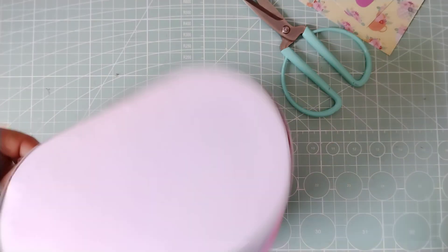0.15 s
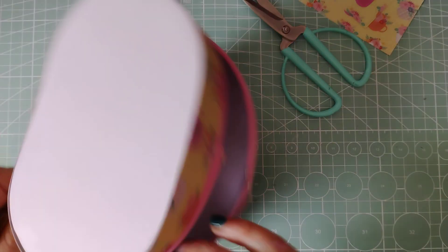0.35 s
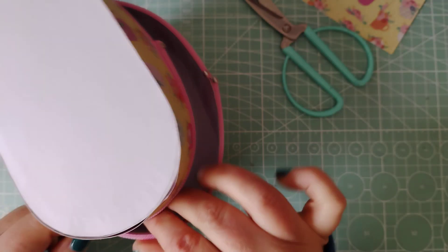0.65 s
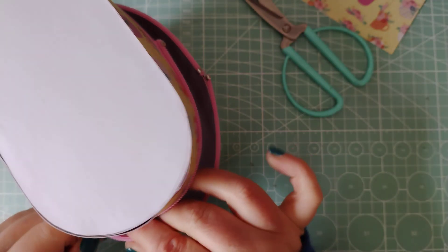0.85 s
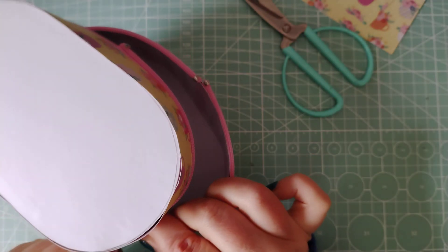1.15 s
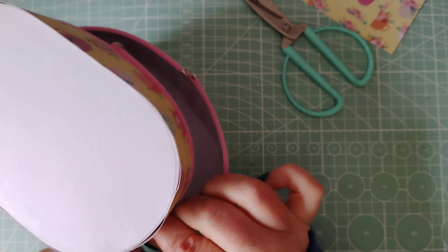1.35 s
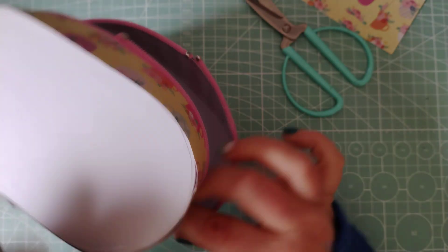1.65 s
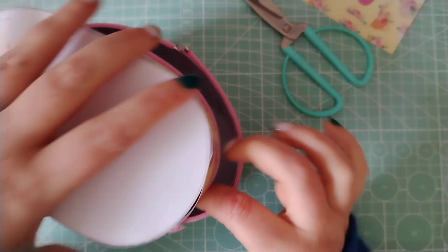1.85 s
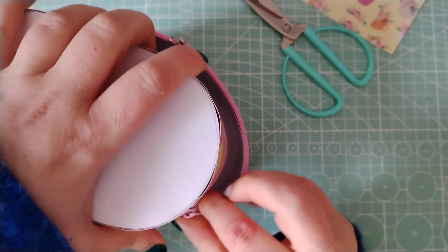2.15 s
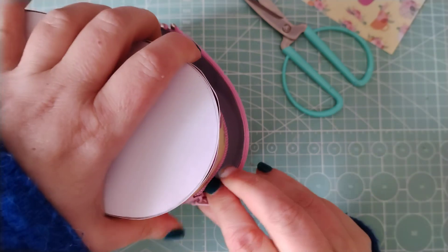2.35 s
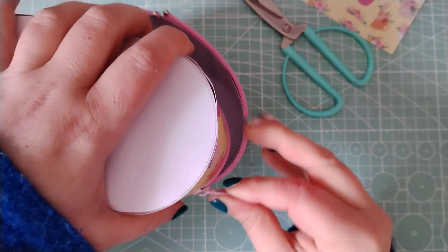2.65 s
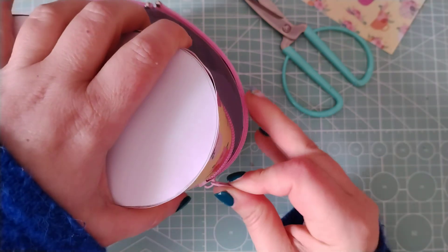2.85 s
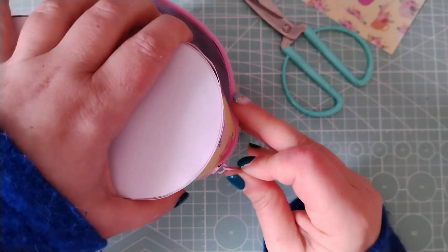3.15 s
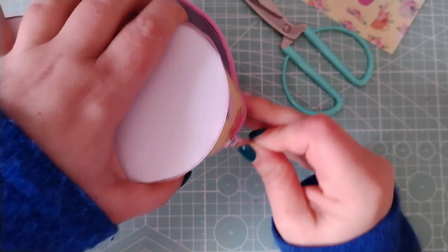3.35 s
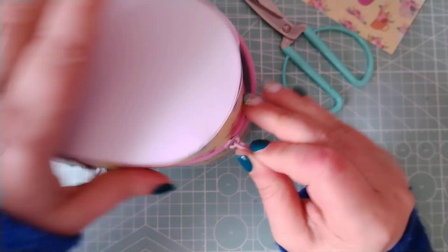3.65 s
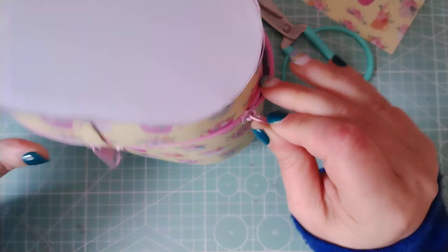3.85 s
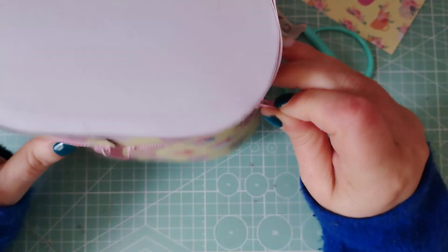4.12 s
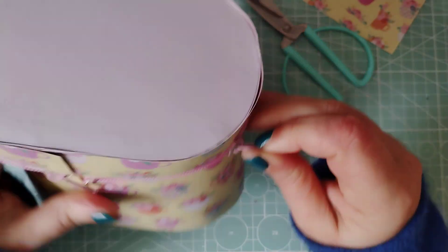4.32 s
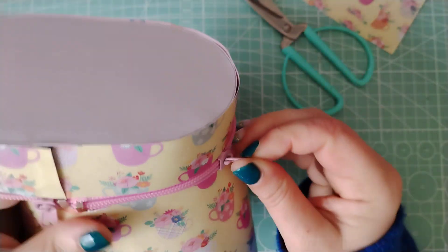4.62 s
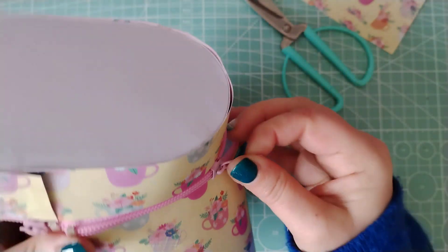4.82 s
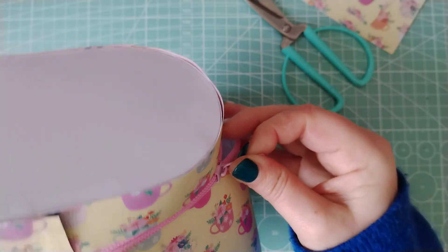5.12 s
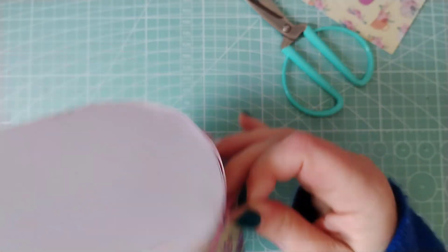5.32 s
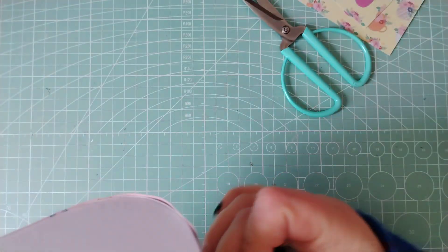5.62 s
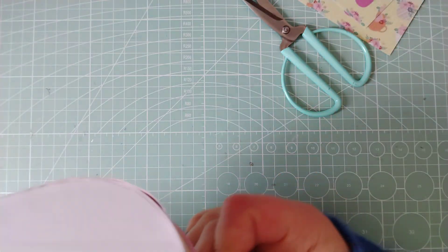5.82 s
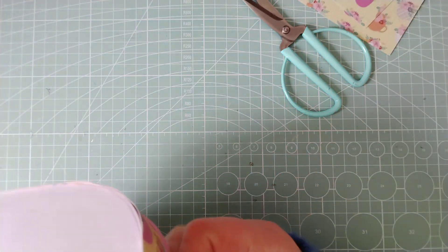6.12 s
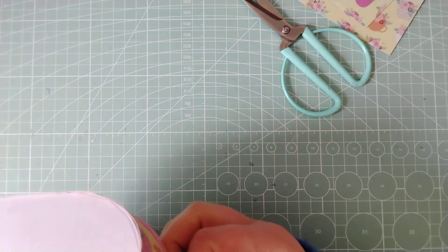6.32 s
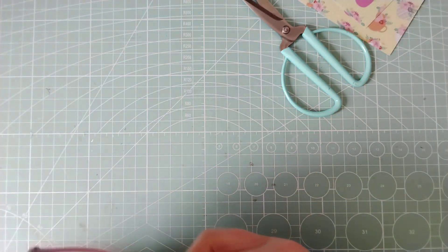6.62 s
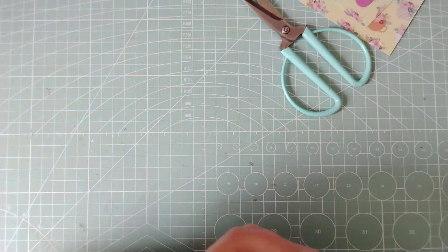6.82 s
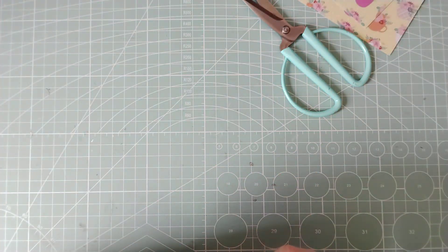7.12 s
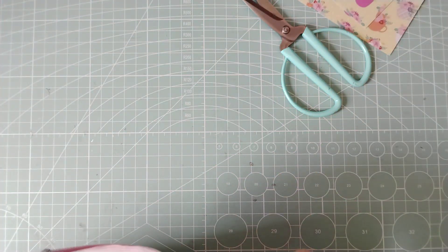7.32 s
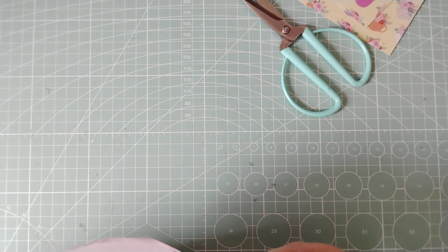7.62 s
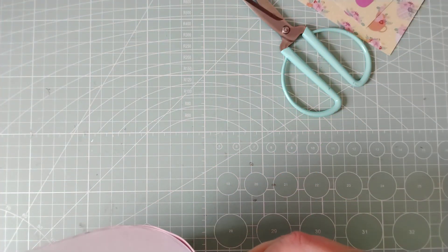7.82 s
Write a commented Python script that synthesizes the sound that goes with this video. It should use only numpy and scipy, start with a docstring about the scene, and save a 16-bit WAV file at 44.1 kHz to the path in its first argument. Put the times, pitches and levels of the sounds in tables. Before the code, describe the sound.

Heard very close in a small, quiet, dry room, slightly right of centre. From 0.06 to 0.4 s a cardboard case scrapes over a desk mat in fine judders, its metal pull ticking twice near 0.3. At about 0.57 it drops with a dull hollow clop, the loudest moment, and rocks to rest by 0.7. From 0.9 to 1.5 stiff zipper tugs rasp briefly amid dry, hollow catches, strongest near 1.3 and 1.47. Shorter, papery zips and finger rubs continue to 2.3, then sparse tugs near 2.7, 3.1 and 3.4, with bright metal ticks at 3.5. Tugs and soft bumps gather from 3.6 to 4.4. Only faint rubs and light knocks remain until 5.6. Rasps return at 5.8, with a low hand bump at 6.3 and a sharp click at 6.6. After quiet rustling, a last cluster of tugs and bumps runs from 7.4 to 7.8.

```python
"""On a desk in a small room, a phone stands just above a paper-covered cardboard case; the room is very quiet.
First the case scrapes over the desk mat while its metal pull ticks; then it clatters down and rocks to rest.
Then hands work the stiff zipper round it in short tugs: teeth rasp, dry clicks and catches ring the case.
Throughout, fingers rub and rustle on the paper and bump the walls. Slips, pushes and blows drive filters
for the hollow body, the stiff wall and the paper surface, heard direct and scattered at two microphones."""
import sys
import numpy as np
from scipy import signal
from scipy.fft import rfft, irfft
from scipy.io import wavfile

SR = 44100
rng = np.random.default_rng(int(sys.argv[2]) if len(sys.argv) > 2 else 0)


def transcribe(signal):
    """Save signal, clipped to [-1, 1], as a 16-bit WAV file at the path in sys.argv[1]."""
    frames = np.atleast_2d(signal).T
    limited = np.clip(frames, -1, 1)
    pcm = np.round(limited * 32767).astype(np.int16)
    wavfile.write(sys.argv[1], SR, pcm)


N = 351477

# Room tone: (frequency [Hz], relative level [dB])
ROOM = [(250, 2), (800, -15), (8000, -14)]
# Faint rustle under the holding fingers, before each part's offset: (time [s], level [dB])
GRIP = [(0, -59), (0.75, -63.5), (1.15, -66.5), (1.419, -78), (1.63, -66), (2.25, -67.5), (2.54, -71.5),
        (2.75, -69.5), (2.901, -108), (3.021, -83), (3.449, -71), (4.7, -67.5), (5.15, -84), (5.8, -58),
        (6.08, -70.5), (6.38, -63), (7.199, -90.5), (7.5, -69), (7.92, -85)]
# Soft bumps of hand and desk on the case: (time [s], body level [dB], ring [Hz])
BUMPS = [(0.584, -28.5, 230), (0.803, -48.5, 333), (1.329, -41.5, 52), (1.572, -36, 316), (1.803, -39, 360),
         (3.584, -46.5, 274), (3.683, -39.5, 145), (3.718, -44, 373), (4.104, -55, 130),
         (4.268, -44.5, 230), (4.302, -31, 137), (4.416, -40.5, 167), (4.994, -48, 130),
         (5.389, -52.5, 121), (6.204, -37.5, 233), (6.295, -28, 222), (6.305, -34.5, 72), (7.391, -49, 130),
         (7.447, -43, 140), (7.463, -38.5, 395), (7.759, -42, 156)]
# Fingers sliding on paper: (start [s], length [s], body level [dB], extra edge [dB])
RUBS = [(0.423, 0.015, -43.5, -2.5), (0.595, 0.14, -42, -3), (1.683, 0.2, -50, -4),
        (1.976, 0.092, -51.5, 9.5), (2.262, 0.08, -55.5, -0.5), (2.406, 0.064, -57, -3.5),
        (3.17, 0.059, -56.5, 3), (3.658, 0.099, -49, -3.5), (3.79, 0.1, -57, 2), (4.388, 0.084, -53.5, 2),
        (4.584, 0.089, -55.5, 3), (4.81, 0.1, -62, -0.5), (5.218, 0.073, -67.5, -6.5),
        (5.62, 0.031, -41, 4.5), (6.176, 0.091, -55, -3.5), (6.727, 0.096, -57.5, 1.5),
        (7.003, 0.095, -85, 3), (7.923, 0.061, -60.5, -7.5)]
# Case scraping over the desk mat: (time [s], body level [dB])
DRAG = [(0.06, -47.5), (0.15, -34.5), (0.25, -38), (0.37, -45), (0.405, -58.5)]
# Case set down on the desk, rocking to rest: (time [s], body level [dB], ring [Hz])
LANDINGS = [(0.57, -20.5, 850), (0.581, -22, 584), (0.597, -34, 580), (0.621, -36.5, 560),
            (0.647, -28, 670), (0.66, -36, 590)]
# Tugs of the slider: (start [s], length before the creep [s], body level [dB], extra edge [dB])
TUGS = [(0.972, 0.023, -40, 6.5), (1.158, 0.032, -35, -3), (1.272, 0.047, -28.5, -4),
        (1.464, 0.036, -39, -6), (1.738, 0.041, -50, 13), (1.928, 0.03, -45, 16), (2.032, 0.039, -48.5, 5),
        (2.151, 0.014, -42, -4), (2.24, 0.024, -54, 25), (2.682, 0.016, -40.5, -7),
        (3.07, 0.02, -33.5, -0.5), (3.353, 0.02, -43.5, 3), (3.564, 0.024, -41, 0),
        (3.792, 0.012, -41.5, -1), (4, 0.012, -41, 5), (4.018, 0.036, -42, 4.5), (4.291, 0.041, -40, 12.5),
        (5.818, 0.052, -39.5, 6.5), (5.93, 0.025, -40.5, 4.5), (6.399, 0.029, -43.5, 3),
        (6.461, 0.016, -41, 11), (6.591, 0.036, -45.5, 17.5), (7.387, 0.018, -39.5, -6.5),
        (7.447, 0.052, -37.5, -2.5), (7.624, 0.0099, -39.5, 0), (7.739, 0.031, -37.5, -4.5)]
# Catches of the slider and knocks on the case: (time [s], body level [dB], extra edge [dB])
KNOCKS = [(0.363, -40, 8), (0.648, -44, 9.5), (0.921, -42.5, -18), (1.011, -61, 10), (1.03, -32.5, 1),
          (1.045, -46, 4.5), (1.102, -37, -4), (1.158, -40.5, -3), (1.171, -34, -1.5), (1.2, -33, 4.5),
          (1.229, -49, 5), (1.296, -35, 4), (1.313, -26.5, 6.5), (1.331, -26, 0.5), (1.455, -31.5, -1.5),
          (1.47, -27.5, 4), (1.695, -41, 3), (1.709, -50, 16.5), (2.094, -49, 8), (2.209, -49, -3),
          (2.238, -42, -1), (2.612, -47.5, 3.5), (3.111, -33, 3), (3.347, -38, 1), (4.052, -45.5, 0),
          (4.234, -45, -1), (4.267, -41.5, -0.5), (4.367, -38.5, 6.5), (4.995, -46, 2.5),
          (5.728, -45.5, -8.5), (5.955, -41, 2.5), (6.312, -36.5, -9.5), (6.601, -37.5, 6),
          (7.448, -41.5, 4.5), (7.488, -44, 3.5), (7.76, -46, 7)]
# Short dry clicks ringing the wall, from the set-down, catches and teeth: (time [s], level [dB], ring [Hz])
CLICKS = [(0.571, -27.5, 1170), (1.284, -39.5, 2580), (1.296, -31.5, 1890), (1.313, -32, 2950),
          (1.33, -33.5, 1800), (1.47, -36.5, 2700), (1.508, -43.5, 1500), (2.032, -42.5, 1604),
          (2.219, -47, 1560), (2.287, -46.5, 1630), (3.091, -41.5, 1550), (4.02, -45.5, 1640),
          (6.601, -34.5, 1240), (7.387, -49, 1330)]
# Ticks of the metal pull: (time [s], strike level [dB])
TICKS = [(0.318, -35), (0.332, -37), (0.987, -55), (3.468, -44), (3.501, -36.5), (3.516, -37)]
# Wall under the slider as the zipper travels round the case: (time [s], low ring [Hz], high ring [Hz])
SEAM_RINGS = [(1.3, 666, 1698), (4.0, 369, 1520), (7.5, 380, 1240)]

# Resonances of the case, then of the pull: (frequency [Hz], width [Hz], lift [dB])
CASE_MODES = [(128, 18, 8.5), (227.3, 26, 6.5), (539.4, 60, 4.5), (608, 80, 4), (730, 120, 6.5),
              (1137, 370, 2.5), (1544, 66, 2)]
PULL_MODES = [(2820, 860, 18.5), (4070, 550, 8)]
# Hollow body, stiff wall, paper surface and metal pull: (frequency [Hz], relative level [dB])
BODY = [(30, -25), (60, -2.5), (330, 0.5), (560, 0.5), (1200, -12), (1900, -26), (5000, -57.5)]
CLACK = [(100, -37), (650, -19), (1100, -1.5), (1550, 6.5), (2200, 1.5), (3300, -4.5), (4500, -17),
         (9000, -50)]
HISS = [(300, -41), (2300, -29.5), (3700, 0.5), (6300, 6), (8300, 6), (9700, -6.5), (12000, -11.5),
        (14500, -14)]
PULL = [(200, -8.5), (700, 2), (1400, -6.5), (5000, -10.5), (8500, -16.5), (10500, -38)]

# How the wall's clack (first row) and the surface's hiss (second) follow the body level:
# (level at the usual push [dB], growth [dB per dB of body level], share of the extra edge [ratio])
TUG_LAW = [(-43.5, 0.9, 0.12), (-54.5, 1.5, 0.82)]
KNOCK_LAW = [(-46, 0.86, 0.71), (-55, 0.46, 1)]
RUB_LAW = [(-45, 0.74, 0.24), (-50, 0.59, 0.93)]

USUAL_DB = -40  # body level of the usual push
ROOM_DB = -92
EARLY_T60_S, LATE_T60_S, LATE_DB = 0.093, 0.21, -25.5
DIRECT_DB = -6  # direct sound against scatter, before each source's nearness
SIDE_CORNER_HZ, SIDE_DB, MAX_PORT_DELAY_S = 409, -1, 0.00024
CASE_PAN_DB = -0.97  # left minus right
BLOW_S = 0.02  # time over which a short contact's level is reckoned
TUG_CREEP_S = 0.008
RUB_RISE_SHARE = 0.28  # of a stroke's length
KNOCK_RING_HZ, KNOCK_OCTAVES_PER_DB, KNOCK_SCATTER_OCTAVES = 716, 0.035, 0.11
TOP_HZ = 14500


def undb(db):
    """Decibels to gain."""
    return 10 ** (np.asarray(db) / 20)


def level(x, db, seconds):
    """Give a sound the energy of that rms level held for that time."""
    energy = np.mean(np.sum(x ** 2, axis=-1))
    return x * undb(db) * np.sqrt(seconds * SR / energy)


def add(out, start, x):
    """Mix a sound in at its time."""
    i = int(start * SR)
    out[:, i:i + x.shape[1]] += x[:, :N - i]


def butter(x, hz, kind, order=1):
    """Low-pass or high-pass."""
    return signal.sosfilt(signal.butter(order, hz, kind, fs=SR, output="sos"), x)


def convolve(x, response):
    """Pass a sound through an impulse response."""
    return signal.fftconvolve(np.atleast_2d(x), np.atleast_2d(response), axes=-1)


def impulse_response(spectrum, modes=(), size=4096):
    """Minimum-phase response of a broad spectrum with resonances on it, made by folding its cepstrum."""
    f = np.maximum(np.fft.rfftfreq(size, 1 / SR), 1)
    points_hz, points_db = np.transpose(spectrum)
    db = np.interp(np.log(f), np.log(points_hz), points_db)
    for hz, width_hz, lift_db in modes:
        db = db + lift_db / (1 + (2 * (f - hz) / width_hz) ** 2)
    cepstrum = irfft(np.log(undb(db)))
    cepstrum[1:size // 2] *= 2
    cepstrum[size // 2 + 1:] = 0
    return irfft(np.exp(rfft(cepstrum)))


def paths(direct_db, size=11000):
    """From one spot on the case to two microphones: direct sound, then scatter off desk and walls."""
    t = np.arange(size) / SR
    early = undb(-60 * t / EARLY_T60_S)
    late = undb(LATE_DB - 60 * t / LATE_T60_S)
    onset = 1 - np.exp(-t / 0.00031)
    mid, side = rng.standard_normal((2, size)) * (early + late) * onset
    # long waves reach both microphones alike
    side = undb(SIDE_DB) * butter(side, SIDE_CORNER_HZ, "high")
    both = level(np.array([mid + side, mid - side]), 0, 1 / SR)
    for channel in range(2):
        delay = int(rng.uniform(0, MAX_PORT_DELAY_S) * SR)
        both[channel, delay] += undb(direct_db)
    return both


def sound_case(force, parts, levels_db, seconds, near_db=0):
    """A force drives each part of the case to its own level; near spots sound more direct."""
    arriving = convolve(force, paths(DIRECT_DB + near_db))
    return sum(level(convolve(arriving, part), db, seconds) for part, db in zip(parts, levels_db))


def loads(law, db, edge_db):
    """Levels of body, clack and hiss for a push of that strength and sharpness."""
    return [db] + [usual + growth * (db - USUAL_DB) + share * edge_db for usual, growth, share in law]


def spot(force, hz, lift=2.6, q=4.1):
    """Each spot on the wall favours a resonance of its own; lift is its added gain."""
    return force + lift * signal.lfilter(*signal.iirpeak(hz, q, fs=SR), force)


def stick_slip(size, rate_hz, depth_db):
    """Friction holds and lets go: its gain wanders at random, this many times a second."""
    steps = np.arange(size) * rate_hz / SR
    held = rng.standard_normal(int(steps[-1]) + 2)
    return undb(depth_db * np.interp(steps, np.arange(len(held)), held))


def fibres(size, per_second, spread_db):
    """Friction as many tiny slips at random times, a few much larger than the rest."""
    slips = rng.random(size) < per_second / SR
    strength = undb(spread_db * np.minimum(rng.exponential(size=size), 5))
    x = slips * strength * rng.standard_normal(size)
    return x / (np.std(x) + 1e-9)


def blow(crunch_db=-26, crunch_s=0.0018, size=900):
    """A sharp contact and the decaying crunch of the surfaces settling."""
    force = undb(crunch_db) * np.exp(-np.arange(size) / SR / crunch_s) * rng.standard_normal(size)
    force[0] += 1
    return force


def room_tone():
    """The very quiet room: steady noise, mostly low, independent at the two microphones."""
    noise = convolve(rng.standard_normal((2, N)), impulse_response(ROOM))[:, :N]
    return level(noise, ROOM_DB, N / SR)


def grip(parts, body_db=3.5, clack_db=2.0, hiss_db=-1, lowest_hz=520, highest_hz=760):
    """The holding fingers creep on the paper in fits and starts, each stretch on another spot."""
    out = np.zeros((2, N))
    offsets_db = np.array([body_db, clack_db, hiss_db])
    for (start, start_db), (end, end_db) in zip(GRIP, GRIP[1:]):
        seconds = max(end - start, BLOW_S)
        size = int(seconds * SR)
        pressure = undb(np.linspace(start_db, end_db, size))
        creep = pressure * fibres(size, per_second=1400, spread_db=3.0)
        creep = creep * stick_slip(size, rate_hz=40, depth_db=3.0)
        creep = butter(creep, 190, "high")  # so light a touch hardly moves the whole box
        spot_hz = lowest_hz * (highest_hz / lowest_hz) ** rng.random()
        creep = spot(creep, spot_hz, lift=1.3)
        mean_db = 10 * np.log10(np.mean(pressure ** 2))
        add(out, start, sound_case(creep, parts, mean_db + offsets_db, seconds, near_db=2))
    return out


def bumps(parts, clack_db=-18, hiss_db=-27, q=2.1, softness=1.4, size=3000):
    """A soft contact is a long push: it wakes a low resonance, and the paper crunches a little."""
    out = np.zeros((2, N))
    for start, db, hz in BUMPS:
        push = butter(signal.unit_impulse(size), softness * hz, "low", order=2)
        push = signal.lfilter(*signal.iirpeak(hz, q, fs=SR), push)  # the wall springs back
        force = push / np.max(push) + blow(crunch_db=-21, crunch_s=0.02, size=size)
        levels_db = [db, db + clack_db, db + hiss_db]
        add(out, start, sound_case(force, parts, levels_db, BLOW_S, near_db=5))
    return out


def rubs(parts):
    """Skin drags over paper, swelling to a peak and dying away; each stroke crosses another spot."""
    out = np.zeros((2, N))
    for start, seconds, db, edge_db in RUBS:
        t = np.arange(0, max(seconds, BLOW_S), 1 / SR)
        swell = np.interp(t, [0, RUB_RISE_SHARE * t[-1], t[-1]], [0, 1, 0])
        force = swell * fibres(len(t), per_second=1400, spread_db=2.5)
        force = force * stick_slip(len(t), rate_hz=120, depth_db=2.0)
        spot_hz = 740 * 2 ** (0.15 * rng.standard_normal())
        force = spot(force, spot_hz, lift=1.0)
        levels_db = loads(RUB_LAW, db, edge_db)
        add(out, start, sound_case(force, parts, levels_db, t[-1], near_db=4.5))
    return out


def drag(parts, clack_db=-7.0, hiss_db=-9, ring_hz=850):
    """The base scrapes over the mat: a dense run of fine slips that comes in small judders."""
    out = np.zeros((2, N))
    times, dbs = np.transpose(DRAG)
    t = np.arange(times[0], times[-1], 1 / SR)
    pressure = undb(np.interp(t, times, dbs))
    force = pressure * fibres(len(t), per_second=2600, spread_db=2.0)
    force = force * stick_slip(len(t), rate_hz=220, depth_db=3.0)
    force = spot(force, ring_hz, lift=0.75)
    db = 10 * np.log10(np.mean(pressure ** 2))
    levels_db = [db, db + clack_db, db + hiss_db]
    add(out, times[0], sound_case(force, parts, levels_db, t[-1] - t[0], near_db=5))
    return out


def landings(parts, clack_db=-11, hiss_db=-29, dull_hz=1100):
    """The base meets the desk with a dull, hollow clop and rocks from edge to edge."""
    out = np.zeros((2, N))
    for start, db, hz in LANDINGS:
        force = butter(spot(blow(), hz), dull_hz, "low", order=2)
        levels_db = [db, db + clack_db, db + hiss_db]
        add(out, start, sound_case(force, parts, levels_db, BLOW_S, near_db=1))
    return out


def clicks():
    """Short dry clicks from the set-down, catches and teeth, each ringing one resonance of the wall."""
    out = np.zeros((2, N))
    for start, db, hz in CLICKS:
        wall = impulse_response(CLACK, [(hz, 640, 12)])  # width in Hz, lift in dB
        add(out, start, sound_case(blow(crunch_db=-21), [wall], [db], BLOW_S, near_db=6.5))
    return out


def tick(db, body, chatter_db=-5, body_db=-12, chatter_s=0.018, size=800):
    """The pull strikes the slider and rings briefly, then chatters against it and shakes the case."""
    ringing_pull = impulse_response(PULL, PULL_MODES)
    strike = sound_case(signal.unit_impulse(size), [ringing_pull], [db], BLOW_S, near_db=11.5)
    fade = np.exp(-np.arange(size) / SR / chatter_s)
    rattle = fibres(size, per_second=1700, spread_db=2.5) * fade
    levels_db = [db + chatter_db, db + body_db]
    return strike + sound_case(rattle, [impulse_response(PULL), body], levels_db, BLOW_S)


def knock(db, edge_db, high_hz, parts):
    """A catch or knock strikes the hollow case; a stronger clack rings higher."""
    levels_db = loads(KNOCK_LAW, db, edge_db)
    octaves = KNOCK_OCTAVES_PER_DB * (levels_db[1] - USUAL_DB)
    octaves += KNOCK_SCATTER_OCTAVES * rng.standard_normal()
    force = spot(blow(), KNOCK_RING_HZ * 2 ** octaves)
    force = spot(force, high_hz, lift=0.92)
    return sound_case(force, parts, levels_db, BLOW_S, near_db=0.2)


def tug(seconds, tooth_hz=250, jitter=0.45, uneven_db=9.5, scrape_db=-25, slip_s=0.002, count=64):
    """The slider breaks free, slows and creeps to rest; teeth snap in spurts, each scraping for a moment."""
    t = np.arange(0, seconds + 2 * TUG_CREEP_S, 1 / SR)
    size = len(t)
    slowing = 1 - 0.4 * np.minimum(t / seconds, 1) ** 2
    creeping = np.exp(-np.maximum(t - seconds, 0) / TUG_CREEP_S)
    speed = slowing * creeping
    teeth_passed = np.cumsum(speed) * tooth_hz / SR
    gaps = np.exp(jitter * rng.standard_normal(count))
    at = np.searchsorted(teeth_passed, np.cumsum(gaps))
    snaps = np.zeros(size + 1)  # teeth never reached fall in the extra last place
    snaps[at] = undb(uneven_db * np.clip(rng.standard_normal(count), -2, 1))
    snaps = snaps[:size] * speed * stick_slip(size, rate_hz=142, depth_db=4.0)
    snaps[0] = 1.12  # the first tooth gives way at once
    scraping = signal.lfilter([1], [1, -np.exp(-1 / (slip_s * SR))], snaps)
    return snaps + undb(scrape_db) * scraping * rng.standard_normal(size)


def zipper(parts):
    """Tugs, catches, knocks and the ticking pull; the wall's rings shift as the slider travels."""
    out = np.zeros((2, N))
    times, low_hz, high_hz = np.transpose(SEAM_RINGS)
    for start, seconds, db, edge_db in TUGS:
        force = spot(tug(seconds), np.interp(start, times, low_hz), lift=0.49)
        force = spot(force, np.interp(start, times, high_hz), lift=0.99)
        levels_db = loads(TUG_LAW, db, edge_db)
        add(out, start, sound_case(force, parts, levels_db, max(seconds, BLOW_S / 2), near_db=1.0))
    for start, db, edge_db in KNOCKS:
        add(out, start, knock(db, edge_db, np.interp(start, times, high_hz), parts))
    for start, db in TICKS:
        add(out, start, tick(db, parts[0]))
    return out


def scene():
    """Zipper and hands sound through the same case, a little to the right, over a very quiet room."""
    parts = [impulse_response(spectrum, CASE_MODES) for spectrum in (BODY, CLACK, HISS)]
    hands = grip(parts) + bumps(parts) + rubs(parts)
    case = hands + drag(parts) + landings(parts) + clicks() + zipper(parts)
    pan = undb(np.array([[CASE_PAN_DB], [-CASE_PAN_DB]]) / 2)
    return room_tone() + case * pan


def record(dry):
    """The phone cuts the top with a steep low-pass."""
    return signal.sosfilt(signal.ellip(8, 0.2, 70, TOP_HZ, fs=SR, output="sos"), dry)


dry = scene()
out = record(dry)
transcribe(out)
```